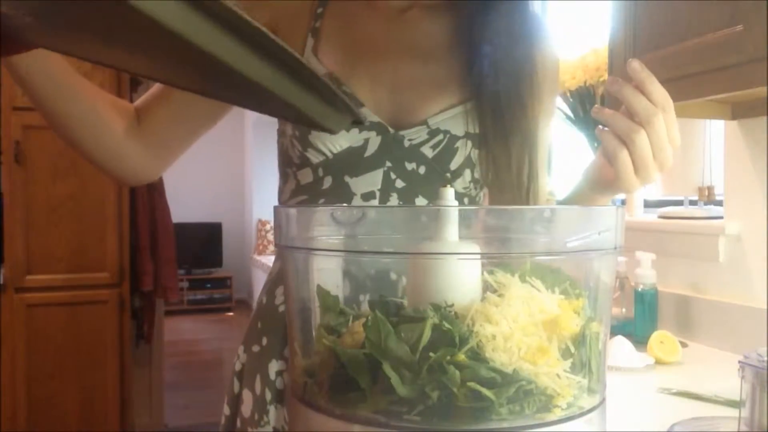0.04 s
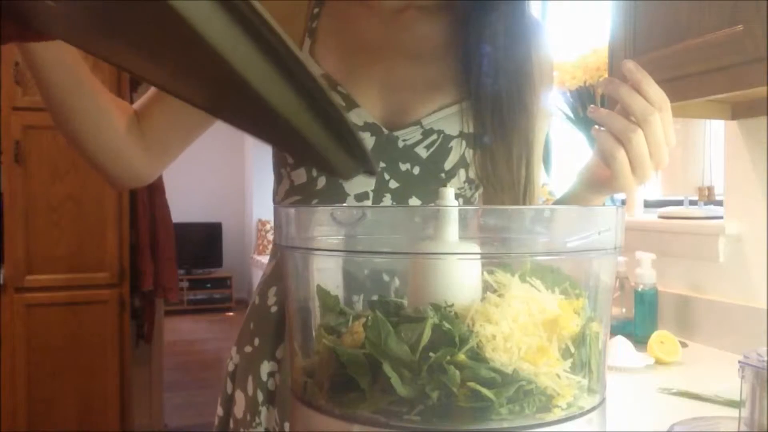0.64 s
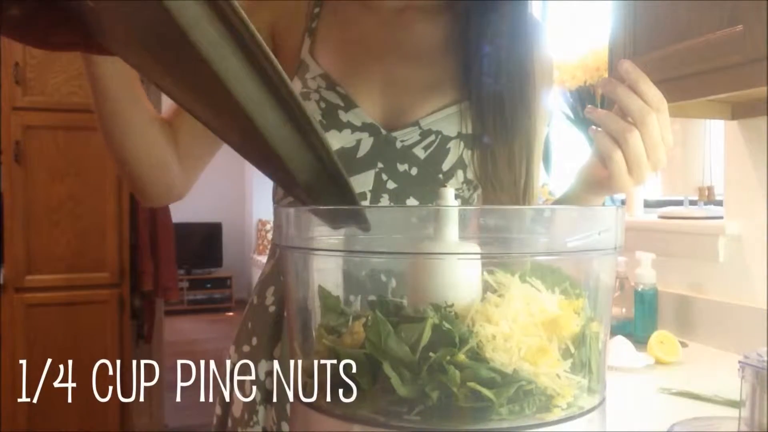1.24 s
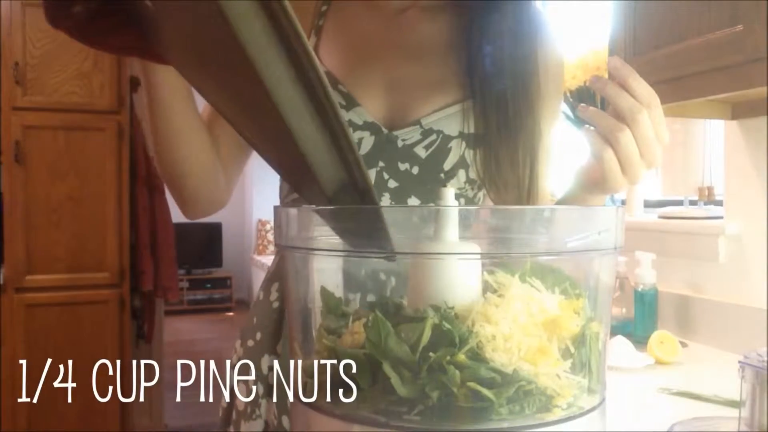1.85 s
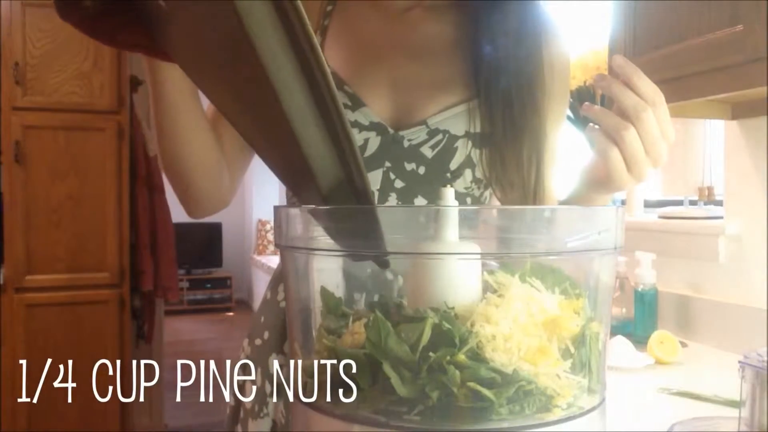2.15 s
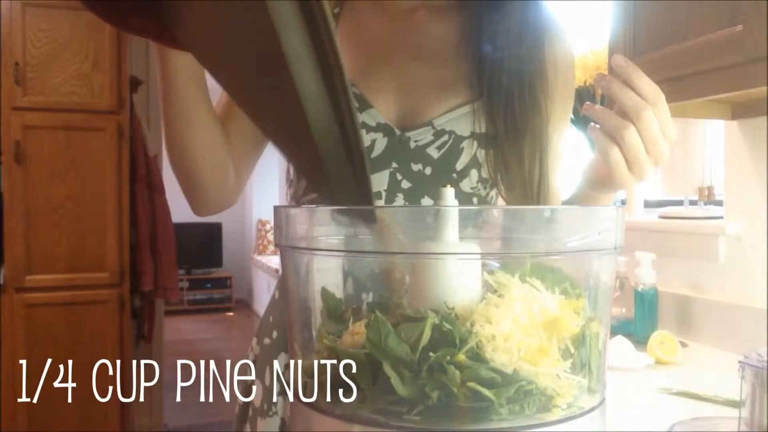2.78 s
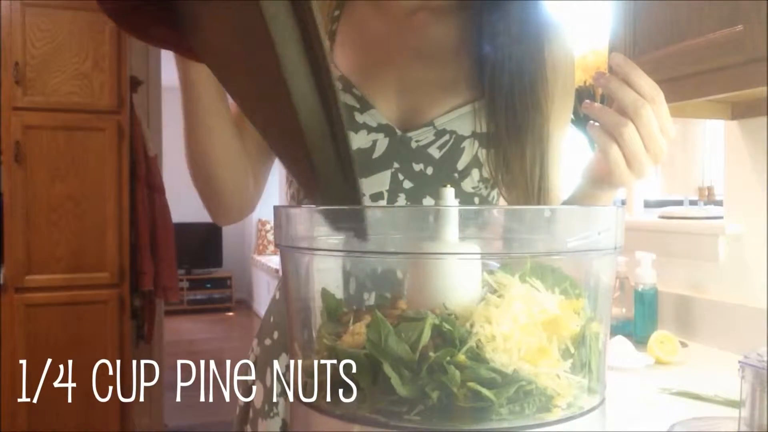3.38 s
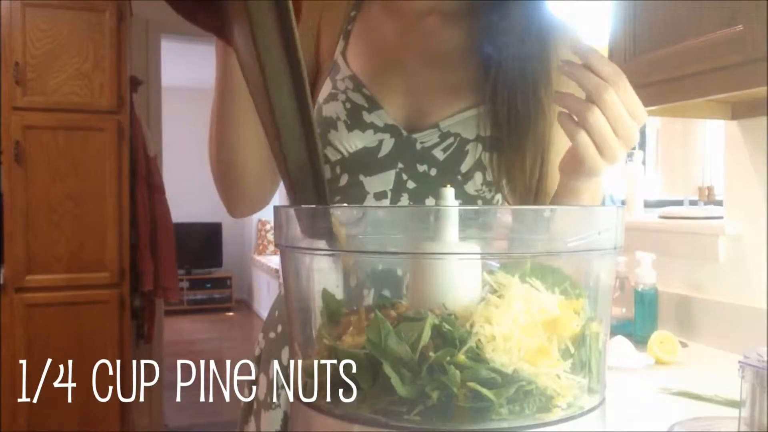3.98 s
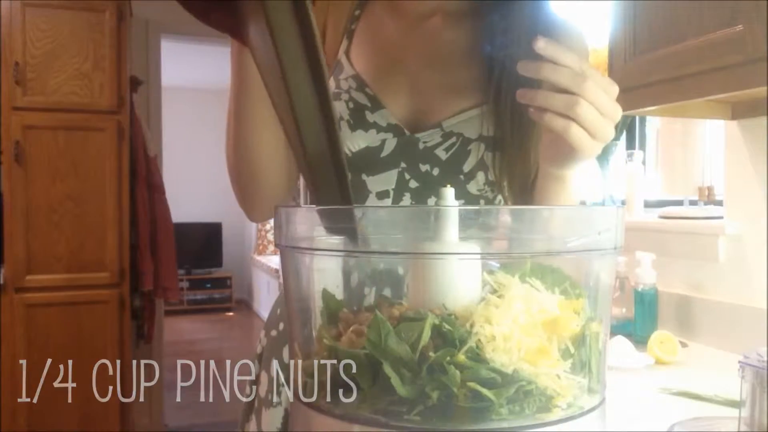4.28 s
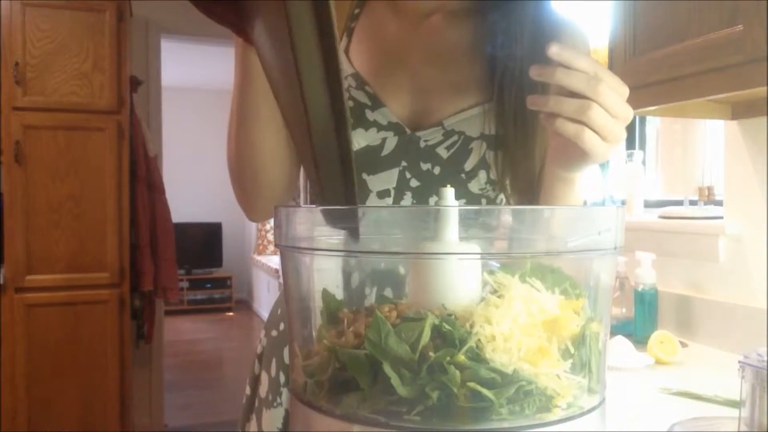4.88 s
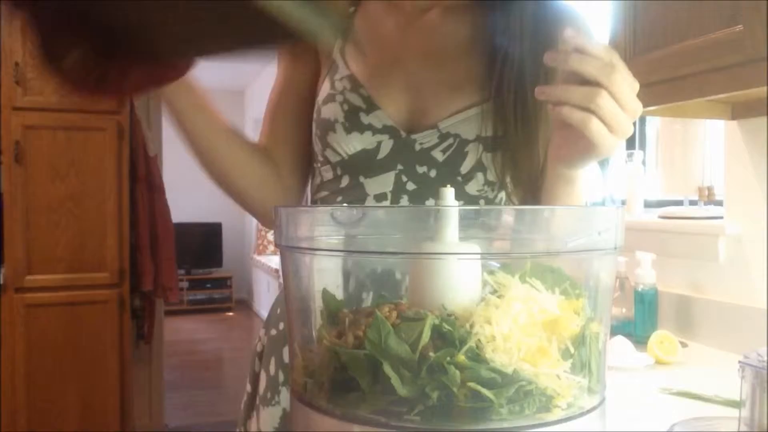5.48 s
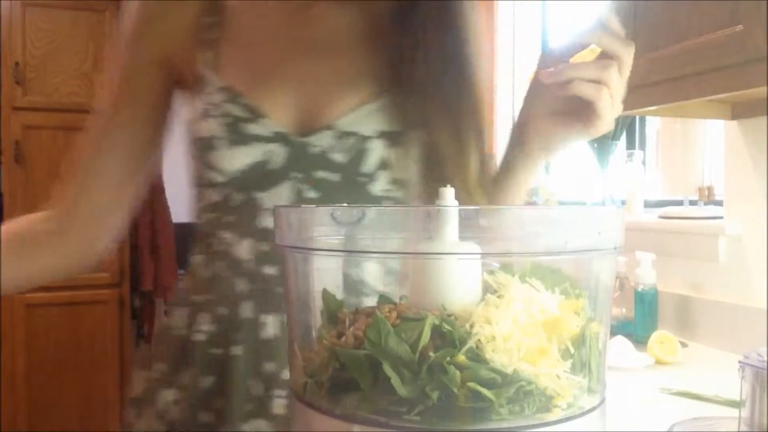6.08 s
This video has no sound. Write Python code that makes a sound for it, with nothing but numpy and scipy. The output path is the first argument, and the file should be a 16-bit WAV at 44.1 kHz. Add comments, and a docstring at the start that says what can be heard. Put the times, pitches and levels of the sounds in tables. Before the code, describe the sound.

Nuts hiss lightly over a metal tray and patter unevenly into a plastic bowl, heard up close. A hollow clack sounds as the tray meets the rim, followed by short scrapes and a cluster of knocks and metallic thuds. The pour thins to single clicks while the tray is shaken again, booming softly. A low appliance hum fills the small kitchen throughout.

```python
"""A hiss and sharp clicks come first: toasted nuts slide down a tilted metal baking sheet and drop
into a plastic bowl of leaves, close by in a kitchen. Many tiny touches make the rustle, hard landings
the clicks. The sheet knocks and rubs on the bowl's rim, and booms when it is jolted to free the last
nuts. A small room answers, over the hum of an appliance."""
import sys
import numpy as np
from scipy import signal
from scipy.fft import rfft, irfft
from scipy.io import wavfile
from scipy.ndimage import uniform_filter1d

SR = 44100
rng = np.random.default_rng(int(sys.argv[2]) if len(sys.argv) > 2 else 0)


def store_pcm(level_fs):
    """Save levels as 16-bit WAV."""
    pcm = np.round(np.clip(level_fs, -1, 1) * 32767).astype(np.int16)
    wavfile.write(sys.argv[1], SR, np.atleast_2d(pcm).T)


N = 270553
TIME = np.arange(N) / SR
HIT_TIME = TIME[:SR]  # one second for each hit

# hum of an appliance's motor: f/Hz, level/dB
HUM_TONES = [(120, -59), (147, -66), (240, -76), (600, -69.5)]
# tone colours of the air, the edge's clack, the sheet's thud, the slide and a nut's click: f/Hz, level/dB
AIR_SPECTRUM = [(20, -79), (40, -15), (55, -7), (85, -10.5), (130, -5), (200, -11), (400, -11),
                (600, -20.5), (900, -27.5), (1500, -34), (3000, -39), (5200, -52), (7800, -43.5),
                (15000, -47.5)]
CLACK_SPECTRUM = [(100, -6), (250, 10.5), (900, -1), (1300, -11), (1800, -8.5), (3200, -9.5), (4200, -9),
                  (6500, -10), (9000, -25.5), (15000, -36)]
THUD_SPECTRUM = [(25, -21), (60, -13), (100, 4.5), (250, 2), (420, -4.5), (600, -12.5), (1000, -19),
                 (1700, -30.5), (4000, -89)]
SLIDE_SPECTRUM = [(300, -19.5), (500, 3), (700, 4.5), (1000, 6), (1550, -5.5), (1800, 0), (2500, -2),
                  (3700, -5.5), (5000, -6.5), (6600, -8.5), (8600, -16.5), (15000, -26)]
CLICK_SPECTRUM = [(300, -29), (900, -4), (1400, -7), (1900, -3.5), (3000, -1.5), (5200, -3.5), (6800, -1.5),
                  (8000, -8.5), (9000, -22), (11000, -18), (15000, -36)]

# A mode is a note that a thing rings at; t60 is the time it takes to fade by 60 dB.
# the bowl's hollow body and its wall: f/Hz, level/dB, t60/s
BOWL_BODY_MODES = [(186, -2, .12), (236, 0, .115), (490, -6, .06), (640, -8, .085), (867, -7, .065),
                   (1060, -15, .07)]
BOWL_WALL_MODES = [(1744, -3, .08), (1857, -10, .08), (2336, -7, .07), (2820, -1, .07), (3040, -2, .08),
                   (3200, -3, .07), (4060, 0, .07), (4340, -8, .06), (4550, -9, .06), (5510, -10, .05),
                   (6030, -11, .05), (6440, -9, .05)]
# the sheet's slow bending, stiffer panel, buckling snap and high shimmer: f/Hz, level/dB, t60/s
BOOM_MODES = [(71.2, -22, 0.79), (103.1, -3.5, 0.37), (162, -18, 0.73), (178.35, -5.5, 0.6),
              (210, -11.5, 0.28)]
PANEL_MODES = [(239, 4.5, 0.043), (280, -1, 0.095), (321.5, 1, 0.16), (343.5, -11, 0.53), (412, -11, 0.089),
               (436, -8.5, 0.19), (529, -1.5, 0.061), (715, -25, 0.12), (809.4, -12.5, 0.092),
               (1002, -9.5, 0.064), (1330, -21, 0.081)]
SNAP_MODES = [(404.6, -4.5, 0.046), (480, -23, 0.028), (306.6, -14.5, 0.032)]
SHIMMER_MODES = [(2121, -5, .3), (2401, -6, .3), (2500, -5, .2), (2792, -5, .2), (3305, -3, .3),
                 (3435, 1, .4), (3661, -2, .25), (3871, -3, .3), (4107, -2, .2), (4334, -2, .2),
                 (5335, 0, .3), (5975, 1, .3), (6342, -2, .2), (7289, -1, .2)]

# the sheet's edge sticking and slipping on the rim: t/s, length/s, level/dB, slip f/Hz, relative grit/dB
RIM_RUBS = [(1.105, 0.17, -57.5, 2496, -8), (2.104, 0.071, -43, 402.5, -0.5),
            (2.628, 0.052, -41, 146, -8.5), (2.694, 0.042, -44.5, 525, -32),
            (2.829, 0.029, -41.5, 539.5, -3), (2.832, 0.18, -46, 135, -4)]
# the sheet's edge knocking on the bowl: t/s, level/dB, relative hollow note/dB, brightest f/Hz
RIM_KNOCKS = [(1.599, -27.5, -0.5, 1900), (1.879, -44, -26, 2430), (1.918, -39, -5.5, 2140),
              (3.014, -32, 1, 940), (3.060, -34, -26, 3160), (3.735, -37, 1, 1610)]
# jolts that flex the sheet: t/s, snap level/dB, boom level/dB, boom tilt/(dB per octave)
SHEET_JOLTS = [(1.823, -26.5, -49.5, 0), (2.911, -19.5, -27.5, 8), (2.965, -35, -35, -10),
               (3.015, -25.5, -36, -12), (3.11, -43, -37.5, 9), (3.155, -52, -36, 3),
               (4.495, -23, -24.5, 4.5), (4.548, -45, -23, -0.5), (4.643, -27, -29.5, 7),
               (4.764, -35, -27.5, 4), (5.184, -33, -27.5, -2)]
# steady flow of nuts down the sheet: t/s, level/dB
POUR_LEVELS = [(0, -54.5), (.2, -55), (.33, -66), (.82, -56.5), (1.02, -57.5), (1.4, -54), (2.1, -59),
               (2.3, -63), (2.8, -61), (3.25, -57), (3.56, -67.5), (3.72, -85), (3.9, -66.5), (4.6, -69),
               (5.1, -79)]
# swells of hiss as the whole heap slips: middle t/s, half length/s, level/dB
HEAP_SLIPS = [(0.09, .12, -72), (1.183, 0.1, -65.5)]
# clumps of nuts skidding off the edge: t/s, length/s, level/dB, brightest f/Hz
CLUMP_SKIDS = [(0.153, 0.013, -42.5, 4500), (1.382, 0.032, -50.5, 5000), (1.422, 0.024, -46.5, 4380),
               (1.562, 0.038, -37.5, 4970), (1.629, 0.032, -36.5, 6800), (3.063, 0.018, -43.5, 3380)]
# the loudest nuts striking the sheet or the bowl: t/s, peak level/dB, brightest f/Hz
NUT_HITS = [(0.149, -34.5, 5100), (0.396, -49, 3300), (0.5911, -43.5, 3400), (0.8091, -44, 2340),
            (0.915, -53, 4830), (1.054, -29, 5800), (1.2136, -37.5, 2400), (1.307, -40, 3060),
            (1.4361, -38, 3660), (1.5068, -34, 7450), (1.8053, -33.5, 4400), (1.9946, -37, 2956),
            (2.196, -40.5, 2140), (2.271, -41, 4200), (2.281, -42, 2060), (2.3426, -46, 3070),
            (2.4617, -42, 4130), (2.5564, -47, 4120), (2.862, -39.5, 3030), (2.948, -33.5, 2880),
            (2.9732, -34.5, 6860), (3.149, -32.5, 6300), (3.163, -40, 3110), (3.197, -34.5, 6660),
            (3.3144, -29.5, 3140), (3.4434, -27.5, 6860), (4.1287, -35, 3180), (4.1602, -42.5, 5370),
            (4.2916, -36, 3760), (4.364, -32, 3030), (4.7163, -36.5, 6390), (4.7853, -38.5, 3060),
            (4.9857, -31.5, 4400)]


def gain(db):
    """Turn decibels into a factor to multiply by."""
    return 10 ** (np.asarray(db) / 20)


def unit(x):
    """Scale to an average strength (rms) of 1."""
    return x / np.sqrt(np.mean(x ** 2))


def unit_hit(x):
    """Scale so that the loudest 4 milliseconds have rms 1."""
    return x / np.sqrt(uniform_filter1d(x ** 2, size=176).max())


def add(out, start, x):
    """Mix x into out from a start time on."""
    i = max(int(start * SR), 0)
    out[i:i + len(x)] += x[:N - i]


def through(x, response):
    """Let every sample of x set off a ring or echo, scaled to an energy of 1."""
    return signal.fftconvolve(x, response / np.linalg.norm(response))[:len(x)]


def colour(x, spectrum, size=4096):
    """Shape the lows and highs of x along (f/Hz, level/dB) points."""
    hz, db = np.transpose(spectrum)
    grid_hz = np.maximum(np.arange(size // 2 + 1) * SR / size, 1)
    curve_db = np.interp(np.log(grid_hz), np.log(hz), db)
    cepstrum = irfft(np.log(gain(curve_db)))
    cepstrum[1:size // 2] *= 2  # keep one half, doubled, so nothing rings ahead of a hit
    response = irfft(np.exp(rfft(cepstrum[:size // 2], size)))
    return through(x, response)


def resonance(x, hz, q):
    """Bring out the sound near one pitch; a higher q makes the band narrower."""
    return signal.lfilter(*signal.iirpeak(min(hz, SR / 2 - 2000), max(q, .9), fs=SR), x)


def fade(t60):
    """Die away by 60 dB every t60 seconds."""
    return np.exp(-np.log(1000) * HIT_TIME / t60)


def rise(seconds):
    """Grow smoothly from 0 towards 1."""
    return 1 - np.exp(-HIT_TIME / seconds)


def ring(modes, scatter_db, detune):
    """Fading notes of a struck thing; each blow lands elsewhere and mixes them anew."""
    out = np.zeros(SR)
    for k, (hz, db, t60) in enumerate(modes):
        louder, higher = rng.standard_normal(2)
        tone = np.sin(2 * np.pi * hz * (1 + detune * higher) * HIT_TIME)
        out += (-1) ** k * gain(db + scatter_db * louder) * fade(t60) * tone
    return out


def burst(t60):
    """Fading noise, like many short notes at once."""
    return rng.standard_normal(SR) * fade(t60)


def grains(per_s, spread_db, count):
    """Tiny touches at random moments, a few much harder than the rest."""
    hit = rng.random(count) < per_s / SR
    size = gain(spread_db * np.minimum(rng.exponential(size=count), 4))
    return unit(hit * size * rng.choice([-1, 1], count))


def kitchen():
    """An appliance's motor hums over a soft rush of air."""
    hum = sum(gain(db) * np.sqrt(2) * np.sin(2 * np.pi * (hz * TIME + rng.random()))
              for hz, db in HUM_TONES)
    air = unit(colour(rng.standard_normal(N), AIR_SPECTRUM))
    return hum + gain(-58) * air


def room(x):
    """Early echoes off counter and cupboards, and a short tail, join the direct sound."""
    early = colour(burst(t60=.13) * rise(.015), [(150, 9), (600, 5), (2000, 7.5), (12000, -7)])
    tail = colour(burst(t60=.61) * rise(.0095),
                  [(100, -2), (500, 3), (3000, -3.5), (7000, -1.5), (12000, 2)])
    return x + gain(-14.5) * through(x, early) + gain(-13) * through(x, tail)


def rim_rubs():
    """The sheet sticks and slips on the rim: a short groan, with grit that rings the bowl's wall."""
    out = np.zeros(N)
    wall = ring(BOWL_WALL_MODES, scatter_db=2, detune=.004)
    for start, length, db, hz, grit_db in RIM_RUBS:
        waver = unit(uniform_filter1d(rng.standard_normal(SR), size=200))
        slip = np.cumsum(hz * (1 + .08 * waver)) / SR % 1  # climbs from 0 to 1 between slips
        groan = unit(resonance(slip - .5, hz, q=3.7))
        grit = colour(rng.standard_normal(SR) * np.exp(-slip / .74), CLACK_SPECTRUM)
        grit = unit(grit + gain(-10) * through(grit, wall))
        swell = np.sin(np.pi * np.minimum(HIT_TIME / length, 1))
        add(out, start, gain(db) * swell * (groan + gain(grit_db) * grit))
    return out


def rim_knocks(clack_t60_s=.073):
    """Metal strikes plastic: a clack, the wall's short ring and a hollow note that swells behind it."""
    out = np.zeros(N)
    for start, db, body_db, hz in RIM_KNOCKS:
        wall = unit_hit(ring(BOWL_WALL_MODES, scatter_db=1.5, detune=.003) * fade(3 * clack_t60_s))
        strike = unit_hit(colour(burst(clack_t60_s), CLACK_SPECTRUM))
        clack = unit_hit(resonance(strike + gain(-4) * wall, hz, q=1.9))
        body = unit_hit(ring(BOWL_BODY_MODES, scatter_db=1, detune=.006) * rise(.004))
        add(out, start, gain(db) * unit_hit(clack + gain(body_db) * body))
    return out


def sheet_jolts():
    """The jolted sheet snaps, thuds and rings, its slow bending booms, and loose nuts rattle."""
    out = np.zeros(N)
    lowest_hz = BOOM_MODES[0][0]
    for start, snap_db, boom_db, tilt in SHEET_JOLTS:
        snap = unit_hit(ring(SNAP_MODES, scatter_db=2, detune=.012) * rise(.004) ** 2)
        thud = unit_hit(colour(burst(t60=.23), THUD_SPECTRUM) * rise(.003))
        panel = unit_hit(ring(PANEL_MODES, scatter_db=4.5, detune=.008) * rise(.018))
        # where the blow lands decides whether the lower or the higher notes boom most
        bending = [(hz, db + tilt * np.log2(hz / lowest_hz), t60) for hz, db, t60 in BOOM_MODES]
        boom = unit_hit(ring(bending, scatter_db=.3, detune=.001) * rise(.01) ** 2)
        bounces = grains(per_s=2500, spread_db=1.5, count=SR) * fade(t60=.15)
        rattle = unit_hit(colour(bounces, CLICK_SPECTRUM))
        blow = gain(snap_db) * (snap + gain(-24.5) * rattle)
        body = gain((snap_db + boom_db) / 2) * (gain(-3) * panel + gain(-2) * thud)
        add(out, start, blow + body + gain(boom_db) * boom)
    return out


def nut_flow(settle_db_per_s=87):
    """How strongly nuts slide: the steady pour, plus those each jolt shakes loose until they settle."""
    power = gain(np.interp(TIME, *np.transpose(POUR_LEVELS))) ** 2
    for start, snap_db, _, _ in SHEET_JOLTS:
        shaken_db = snap_db - 31.5 - settle_db_per_s * np.abs(TIME - start)
        power += (TIME > start) * gain(shaken_db) ** 2
    return np.sqrt(power)


def sliding_nuts(touch_s=.004):
    """Nuts scratch and tumble down the metal, which shimmers; a hiss swells when the heap slips."""
    contacts = gain(-5) * grains(per_s=3500, spread_db=2.5, count=N)
    for hz in (2500, 4000, 6500):  # large to small nuts, each size tumbling on its own
        touches = grains(per_s=42, spread_db=2.2, count=N) ** 2
        fading_power = signal.lfilter([1], [1, -np.exp(-1 / (touch_s * SR))], touches)
        tumble = np.sqrt(fading_power) * rng.standard_normal(N)
        contacts += gain(-6) * unit(resonance(tumble, hz, q=1.2))
    scratch = unit(colour(contacts, SLIDE_SPECTRUM))
    shimmer = unit(through(scratch, ring(SHIMMER_MODES, scatter_db=.4, detune=.0003)))
    rustle = unit(scratch + gain(-7) * shimmer)
    fine_touches = grains(per_s=6400, spread_db=5, count=N)
    hiss = unit(colour(fine_touches, [(3000, -44), (6000, 9), (9000, -1), (11500, -1.5), (15000, -10)]))
    surge = sum(gain(db) * np.exp(-((TIME - middle) / half) ** 2) for middle, half, db in HEAP_SLIPS)
    return nut_flow() * (rustle + gain(-20) * hiss) + surge * hiss


def skidding_clumps():
    """A clump scrapes over the edge in a fast run of touches that rings the bowl's wall."""
    out = np.zeros(N)
    wall = ring(BOWL_WALL_MODES, scatter_db=1, detune=.001)
    for start, length, db, hz in CLUMP_SKIDS:
        run = grains(per_s=3000, spread_db=2.5, count=SR) / (1 + (HIT_TIME / length) ** 8)
        skid = resonance(colour(run, CLICK_SPECTRUM), hz, q=.9)
        add(out, start, gain(db) * unit_hit(skid + gain(-11) * through(skid, wall)))
    return out


def nut_click(db, hz, wall):
    """One nut chatters at its own pitch and rings the bowl's wall; the hardest hits are the briefest."""
    contact_s = .0056 * 2 ** np.minimum((-24 - db) / 11, .5)  # 11 dB softer lasts double, up to a limit
    chatter = grains(per_s=9000, spread_db=2, count=SR) * fade(np.log(1000) * contact_s)
    click = resonance(colour(chatter, CLICK_SPECTRUM), hz, q=1.34)
    hit = unit_hit(click) + gain(-12.5) * unit_hit(through(click, wall))
    return gain(db) * hit / np.abs(hit).max()


def landing_nuts(strays_per_s=8, stray_hz=4170):
    """Single nuts land hard, while stray ones tick at random, louder when more nuts slide."""
    out = np.zeros(N)
    wall = ring(BOWL_WALL_MODES, scatter_db=1, detune=.001)
    for start, db, hz in NUT_HITS:
        add(out, start, nut_click(db, hz, wall))
    pour_s = POUR_LEVELS[-1][0]
    flow_db = 20 * np.log10(nut_flow())
    for when, scatter_db, pitch in rng.uniform(-1, 1, (int(strays_per_s * pour_s), 3)):
        start = pour_s * (when + 1) / 2
        db = flow_db[int(start * SR)] + 14 + scatter_db
        hz = stray_hz * 2 ** (.6 * pitch)  # up to 0.6 octaves either way
        add(out, start, nut_click(db, hz, wall))
    return out


def scene():
    """The kitchen's hum, with the sheet and the nuts sounding in the room, in one channel."""
    background = kitchen()
    sheet = sheet_jolts() + rim_knocks() + rim_rubs()
    nuts = skidding_clumps() + sliding_nuts() + landing_nuts()
    return (background + room(sheet + nuts))[None]


def record(dry, top_hz=15400):
    """Cut away the very highest treble."""
    return signal.sosfilt(signal.ellip(10, .2, 70, top_hz, fs=SR, output="sos"), dry)


dry = scene()
out = record(dry)
store_pcm(out)
```